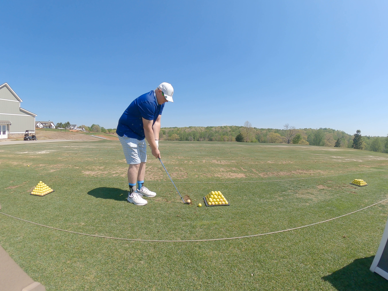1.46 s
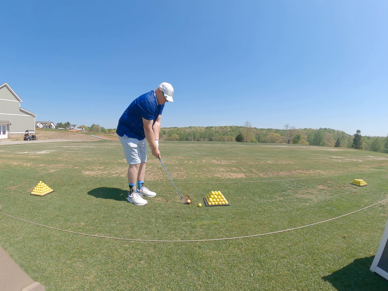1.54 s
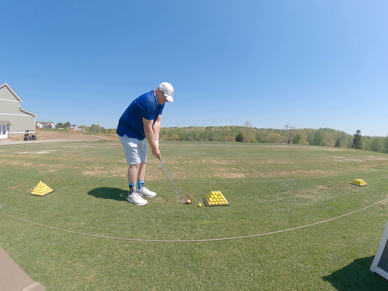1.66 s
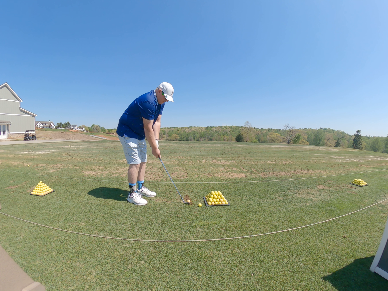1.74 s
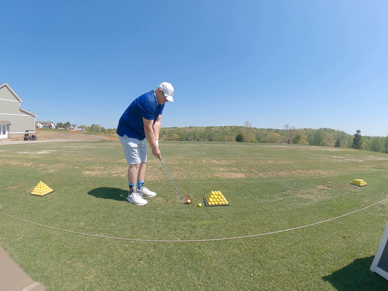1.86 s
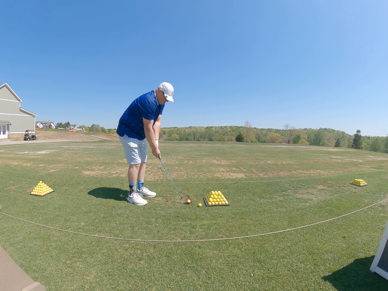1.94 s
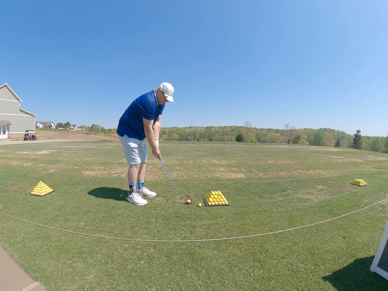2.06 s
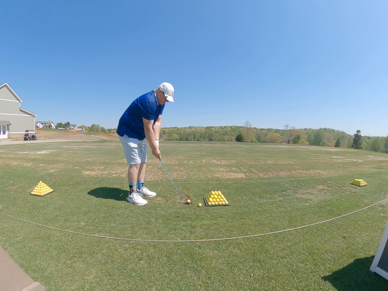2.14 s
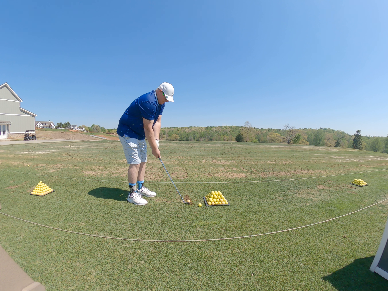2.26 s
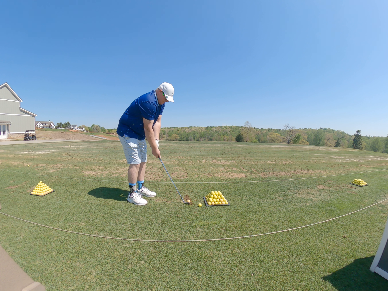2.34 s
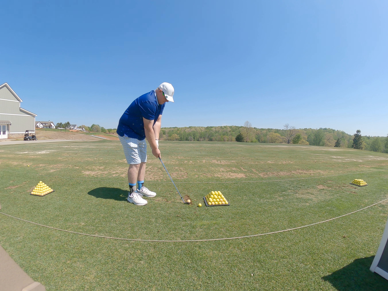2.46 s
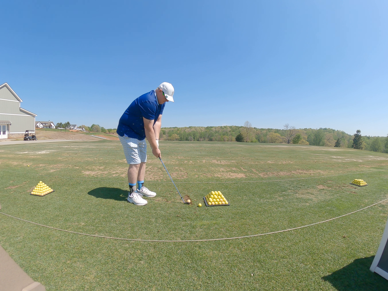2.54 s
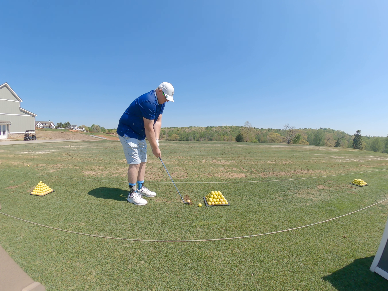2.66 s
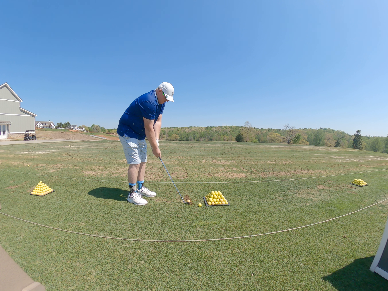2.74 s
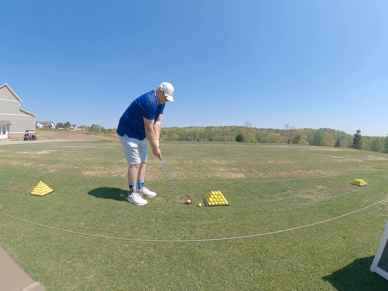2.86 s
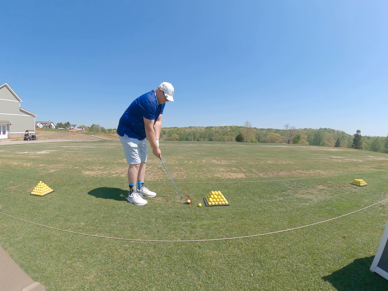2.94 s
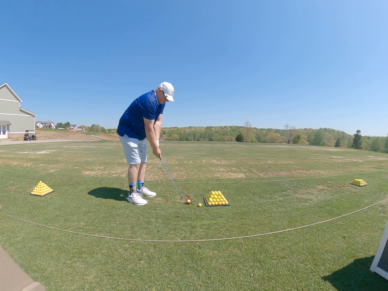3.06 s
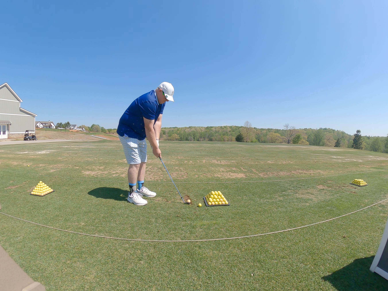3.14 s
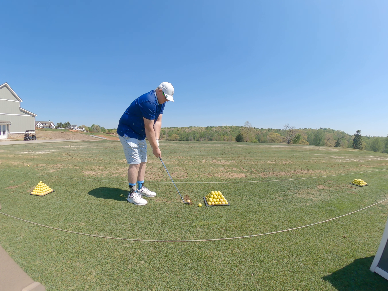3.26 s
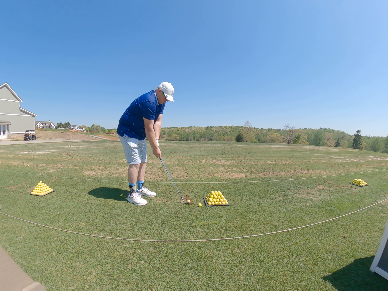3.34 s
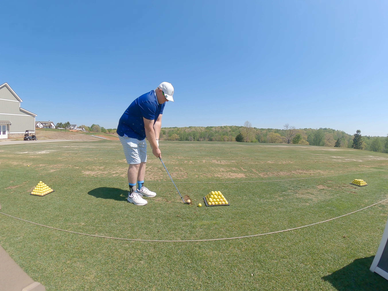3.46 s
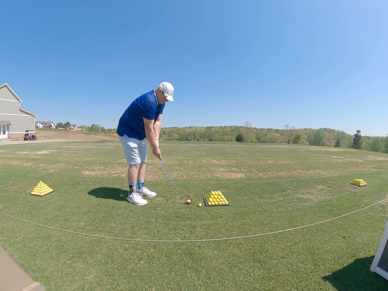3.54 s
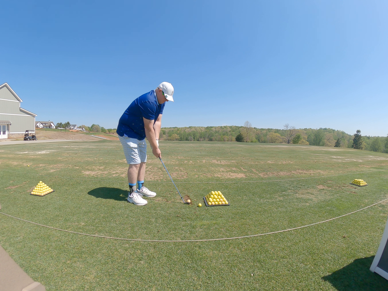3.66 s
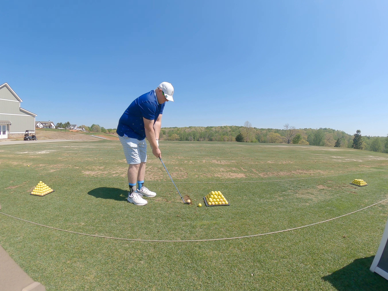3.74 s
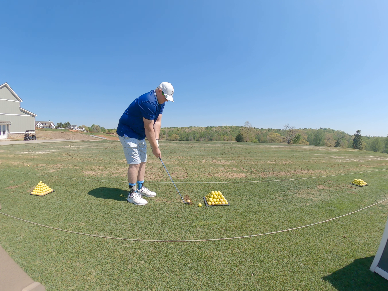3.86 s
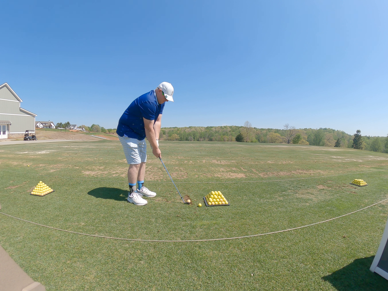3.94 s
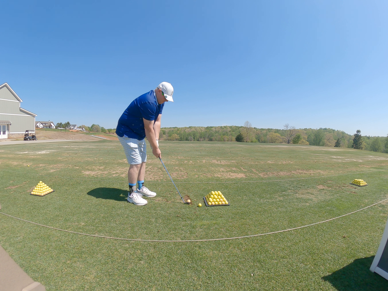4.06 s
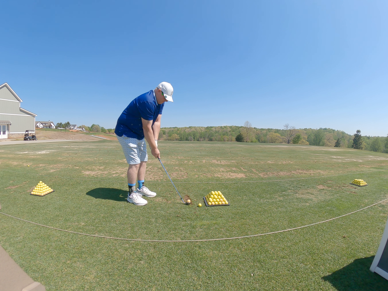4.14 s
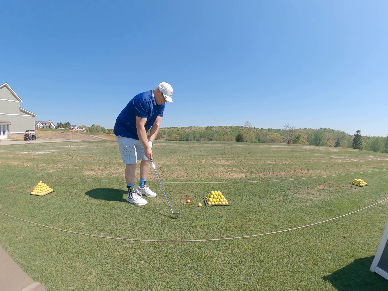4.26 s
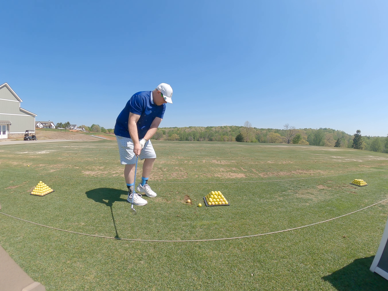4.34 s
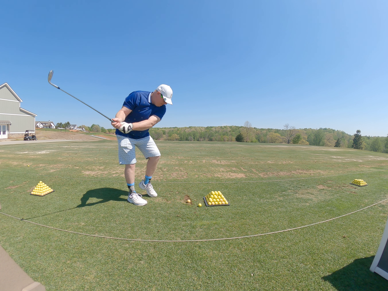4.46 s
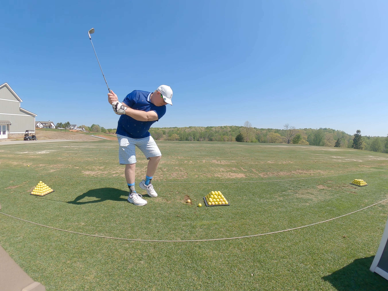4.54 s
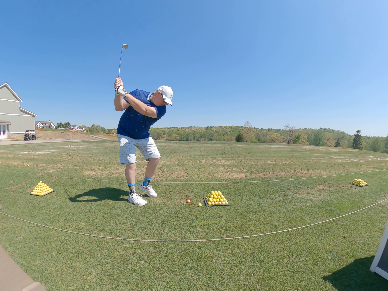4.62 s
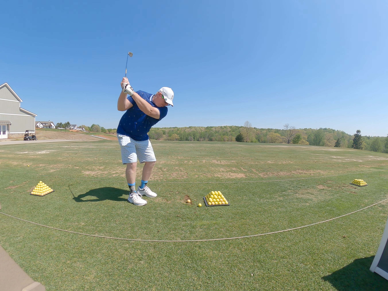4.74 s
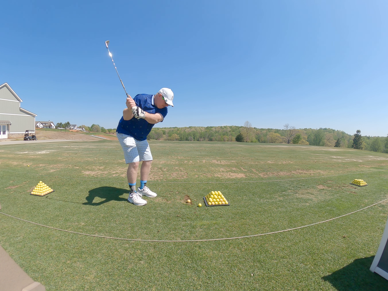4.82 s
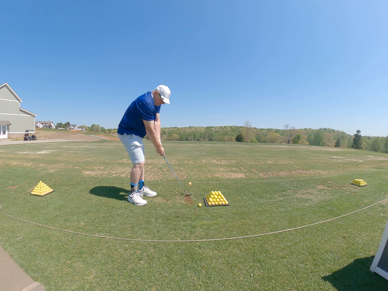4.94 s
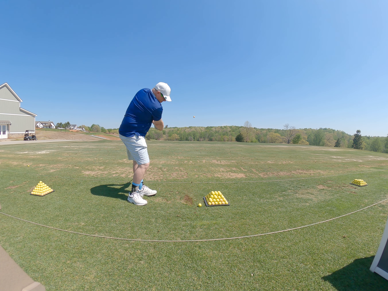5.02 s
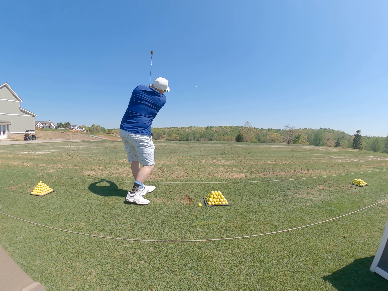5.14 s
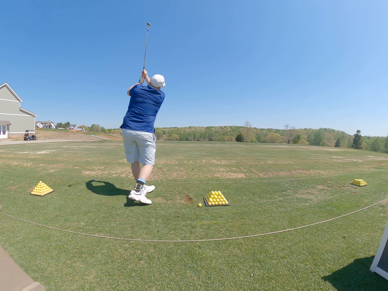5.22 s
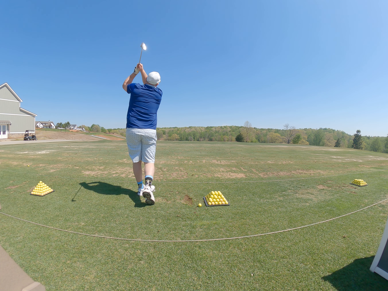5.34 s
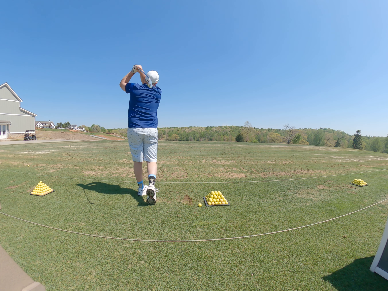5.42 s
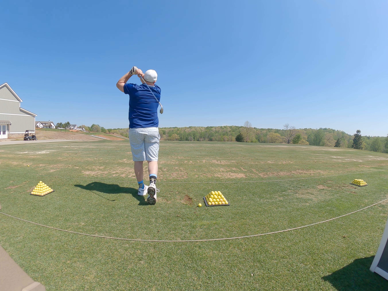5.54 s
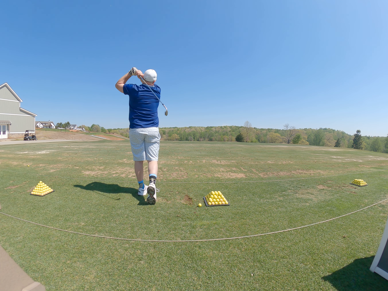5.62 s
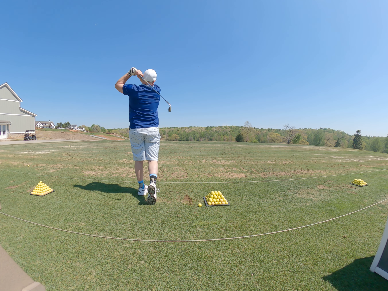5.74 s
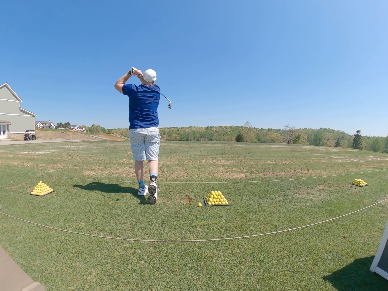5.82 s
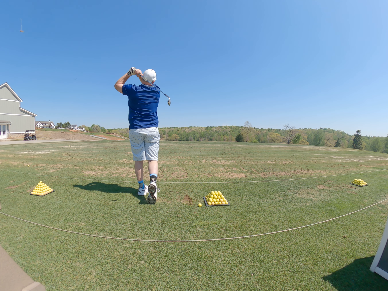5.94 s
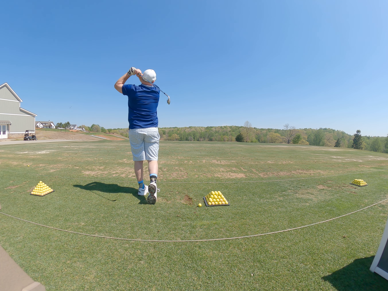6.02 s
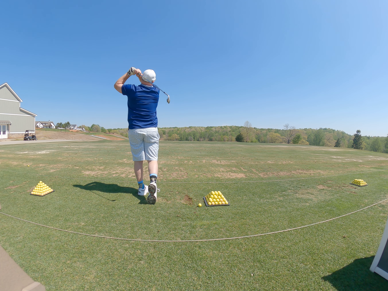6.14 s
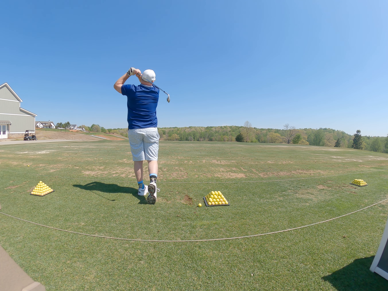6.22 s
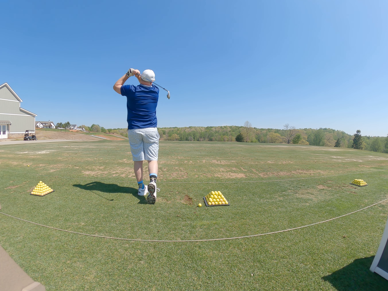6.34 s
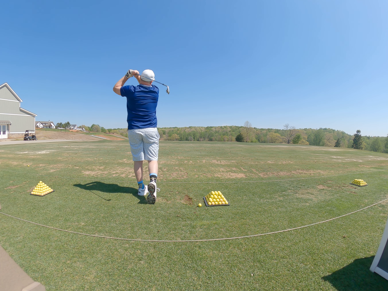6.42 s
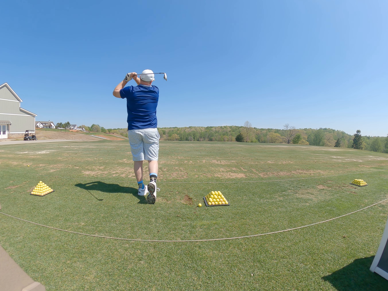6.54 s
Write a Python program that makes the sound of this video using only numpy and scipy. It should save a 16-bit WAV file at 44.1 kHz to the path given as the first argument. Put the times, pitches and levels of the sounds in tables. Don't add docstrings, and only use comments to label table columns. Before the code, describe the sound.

Steady low engine drone and soft outdoor hush with faint bird whistles, then one very loud, dry golf-club crack and a brief patter of soil.

```python
import sys
import numpy as np
from scipy import signal
from scipy.fft import rfft, irfft, next_fast_len
from scipy.io import wavfile
from scipy.ndimage import uniform_filter1d

SR = 44100
rng = np.random.default_rng(int(sys.argv[2]) if len(sys.argv) > 2 else 0)


def unload_audio(sound):
    columns = np.transpose(np.atleast_2d(sound))
    steps = np.round(np.clip(columns, -1, 1) * 32767)
    wavfile.write(sys.argv[1], SR, steps.astype(np.int16))


def invert_db(x):
    u = np.asarray(x, float) / 20
    return 10 ** u


N = 290178
TIME = np.arange(N) / SR
STRIKE_S = 5.06769

# [time_s, strength_db]
WIND = [(0.0, 10.5), (0.2, 0.5), (0.62, 4), (1.0, -3), (1.3, 0.2), (1.56, 2), (1.8, 1.5), (2.05, 3),
        (2.45, -3.5), (2.95, 2.5), (3.25, -0.2), (4.05, 1.5), (4.4, 6.5), (5.8, 4), (5.95, 1), (6.25, -1.5),
        (6.45, 2), (6.58, -0.5)]


def band(x, hz, octaves):
    size = next_fast_len(len(x))
    f = np.fft.rfftfreq(size, 1 / SR) + 1
    bell = np.exp(-.5 * (np.log2(f / hz) / octaves) ** 2)
    y = irfft(rfft(x, size) * bell, size)[:len(x)]
    return y / np.sqrt(np.mean(y ** 2))


def walk(rate):
    k = int(SR / rate)
    held = np.repeat(rng.standard_normal(N // k + 1), k)
    return 1.301 * uniform_filter1d(uniform_filter1d(held, k), k)[:N]


def curves(table, t=TIME):
    s, *columns = np.transpose(table)
    return [np.interp(t, s, c) for c in columns]


def add(out, s, x, pan_db=0., lag=0):
    i, size = int(s * SR), next_fast_len(len(x) + 32)
    f = np.fft.rfftfreq(size, 1 / SR)
    delay_s = lag / SR / (1 + (f / 5000) ** 4)
    late = irfft(rfft(x, size) * np.exp(-2j * np.pi * f * delay_s), size)
    out[0, i:i + len(x)] += late[:len(x)] * invert_db(pan_db / 2)
    out[1, i:i + len(x)] += x * invert_db(-pan_db / 2)


def ring(t, hz, db, t60, rise_ms, sign):
    build = 1 - np.exp(-1000 * t / rise_ms)
    return np.sign(sign) * np.sin(2 * np.pi * hz * t) * invert_db(db - 60 * t / t60) * build


def whistle(hz, db, rough=.01, taper=0.23):
    shiver = band(rng.standard_normal(len(hz) + 2000), 140, 0.98)[:len(hz)]
    tone = np.sin(2 * np.pi * np.cumsum(hz * (1 + rough * shiver)) / SR)
    level = np.sqrt(2) * invert_db(db + 2.5 * shiver[::-1])
    return level * tone * signal.windows.tukey(len(hz), taper)


def glides(out, table, pan_db, lag, rough):
    for s, length, from_hz, to_hz, db in table:
        hz = np.linspace(from_hz, to_hz, int(length * SR))
        add(out, s, whistle(hz, db, rough), pan_db, lag)


def strike(out):
    # [pitch_hz, level_db, t60_s, rise_ms, first_swing_sign]
    face_modes = [(1300, -13.5, 0.0074, .8, -1), (2330, -11, 0.012, 1.6, -1), (950, -18, 0.011, 1.08, -1),
                  (1990, -17.5, 0.022, 0.96, -1), (4240, -24, 0.015, 0.22, 1),
                  (4730, -21.5, 0.011, 0.18, 1), (5600, -22.5, 0.013, 0.25, -1),
                  (6500, -23.5, 0.013, .2, 1), (7600, -23.5, 0.019, .2, -1), (9440, -8, 0.0038, 0.24, 1),
                  (10540, -19, 0.0033, .1, 1), (14000, -17.5, .006, .2, 1)]
    # [pitch_hz, level_db, t60_s, rise_ms, first_swing_sign]
    beating_modes = [(3070, 5.7, .0064, 2.1, 1), (3350, -7.3, .016, 3., -1)]
    # [delay_ms, pitch_hz, level_db, t60_s, first_swing_sign]
    turf_modes = [
        (.4, 190, -17, 0.083, -1),
        (1.9, 95, -12.5, 0.065, 1),
        (0.71, 400, -21.5, 0.028, -1),
    ]

    t = np.arange(5000) / SR
    squash_hz, squash_ms, squash_db = 1230, .315, -2.6
    centred = t[:100] - 50 / SR
    pulse = np.exp(-.5 * (1000 * centred / squash_ms) ** 2)
    squash = invert_db(squash_db) * np.cos(2 * np.pi * squash_hz * centred) * pulse
    add(out, STRIKE_S + .00051 - 50 / SR, squash, pan_db=-2.8, lag=1.3)

    for mode in [*beating_modes, *face_modes]:
        pan_db = -1.5 if mode[0] < 6000 else 1.
        add(out, STRIKE_S, ring(t, *mode), pan_db=pan_db, lag=1.3)

    tear = invert_db(-21.5) * band(rng.standard_normal(len(t)), 2700, 1.0) * np.exp(-(t / 0.0047) ** 2)
    add(out, STRIKE_S, tear, pan_db=-1.0, lag=1.2)

    for delay_ms, hz, db, t60, sign in turf_modes:
        add(out, STRIKE_S + delay_ms / 1000, ring(t, hz, db, t60, 0.22, sign))


def swish(out):
    # [time_s, level_db]
    head_track = [(4.93, -63), (4.991, -52.5), (5.01, -44), (5.04, -37.5), (5.055, -42), (5.0642, -31.5),
                  (5.076, -35), (5.08, -61), (5.092, -50), (5.115, -62.5)]
    impact_hz, lowest_hz, climb_octaves_per_s = 1370, 240, 38
    hiss_db, hiss_grow_db_s, hiss_past_db = -3, 59.5, -22

    t = np.arange(head_track[0][0], head_track[-1][0], 1 / SR)
    db, = curves(head_track, t)
    before = (t - STRIKE_S).clip(max=0)
    past = ((t - STRIKE_S) / .015).clip(0, 1)
    hz = np.maximum(impact_hz * 2 ** (climb_octaves_per_s * before), lowest_hz)
    noise = rng.standard_normal((3, len(t)))
    howl = 0
    for f in 300 * 2 ** np.arange(0, 3, .25):
        weight = np.exp(-.5 * (np.log2(f / hz) / .95) ** 2)
        howl = howl + weight * band(noise[0], f, .2) / 3.4
    hiss = band(noise[1], 2500, 1.1) * invert_db(1.6 * band(noise[2], 200, 1.0))
    hiss_level = invert_db(hiss_db + hiss_grow_db_s * before + hiss_past_db * past)
    add(out, t[0], invert_db(db) * (howl + hiss_level * hiss), pan_db=0.5, lag=1.8)


def spray(out):
    first_s, peak_s, last_s = 5.181, 5.212, 5.55
    shower_db, rise_db_s, fall_db_s = -38, 328, 246
    straggle_db, straggle_fall_db_s = -46.5, 69

    heard = slice(int(first_s * SR), int(last_s * SR))
    since = TIME[heard] - peak_s
    after = since.clip(0)
    rise = invert_db(rise_db_s * since.clip(max=0)) * ((TIME[heard] - first_s) / 0.0039).clip(0, 1)
    fall = invert_db(shower_db - fall_db_s * after) + invert_db(straggle_db - straggle_fall_db_s * after)
    landings = rng.random(N) < 4000 / SR
    grains = landings * rng.standard_normal(N) * invert_db(3.2 * rng.exponential(size=N).clip(0, 3))
    noise = rng.standard_normal((2, len(since)))
    soil = band(grains[heard], 2240, 1.0) + 0.31 * band(noise[0], 2640, 1.0)
    soil = soil + 0.75 * band(noise[1], 750, 1.0)
    x = np.zeros(N)
    x[heard] = rise * fall * soil
    add(out, 0, x * invert_db(-5.5), pan_db=0.0, lag=1.6)


def clods(out):
    # [start_s, length_s, from_hz, to_hz, level_db]
    splits = [(5.178, 0.009, 2020, 3300, -51), (5.186, 0.0089, 1780, 2070, -43),
              (5.22, 0.007, 2640, 1720, -45), (5.211, 0.0066, 2260, 1950, -34.5),
              (5.212, 0.008, 4200, 5320, -40.5), (5.22, 0.0054, 5010, 5700, -41),
              (5.224, 0.0091, 4230, 5600, -47), (5.244, 0.013, 1220, 1520, -40),
              (5.249, 0.0083, 4000, 4360, -48)]
    glides(out, splits, -0.99, lag=0.68, rough=0.09)


def ticks(out):
    # [start_s, peak_db, centre_hz, left_minus_right_db]
    cleat_ticks = [(.03, -62, 6000, 3), (0.0026, -54, 7000, 3), (0.14, -55, 8000, 2), (.1155, -60, 5000, 2),
                   (.1325, -59, 4000, 2), (4.758, -51, 910, 11), (.575, -67, 4000, 2),
                   (0.1306, -54, 6200, 2), (0.8929, -55.5, 5400, 3), (3.697, -58, 13000, 8),
                   (3.7, -55.5, 4300, -6), (.894, -63, 1700, 4), (5.742, -64, 9460, 3.5),
                   (5.5917, -56, 6200, 5), (5.626, -49, 950, 13), (5.664, -52.5, 4600, 9),
                   (4.3, -50, 860, 4.5), (5.8057, -46.5, 4600, 10)]
    # [start_s, peak_db, centre_hz,
    # left_minus_right_db]
    grit_ticks = [(4.591, -41.5, 2780, 2), (5.198, -48, 5500, 1), (5.2895, -45, 7500, 1),
                  (5.3075, -42, 5500, 0), (5.32, -44, 1300, 0), (5.328, -46, 3000, 2),
                  (5.3515, -45, 1900, 3), (5.362, -51, 4000, 1), (5.367, -50, 7500, 1),
                  (5.383, -47, 5500, 1), (5.4175, -51, 2500, 1), (5.431, -50, 4000, 1),
                  (5.4465, -53, 3200, 1), (5.459, -53, 8000, 1), (5.599, -56, 8500, 7), (5.6, -50, 2490, 7),
                  (5.754, -63, 5500, 5), (5.7575, -54, 3500, 8), (5.774, -57, 1500, 6),
                  (5.787, -52, 1800, 6), (5.813, -48, 1500, 8), (5.839, -57, 2000, 8),
                  (5.0086, -37.5, 3800, 4), (5.0642, -24, 1110, -14), (5.066, -34, 1400, -2),
                  (5.193, -45, 5000, 1), (5.2012, -48, 6500, 4), (5.2255, -42, 8000, 1),
                  (5.242, -43, 6000, 1), (5.2465, -38, 7000, -1), (5.272, -50, 4500, 1),
                  (5.2775, -39, 3500, 1), (5.304, -44, 4000, 1), (5.3115, -48, 2500, 1),
                  (5.142, -41.5, 1077, 1), (5.2374, -36, 5500, 8), (5.2564, -40, 4330, 8),
                  (5.2634, -46, 8500, 1.2), (5.2889, -51, 2910, 6), (5.307, -31, 960, -1.5),
                  (5.3243, -35, 3580, 4), (5.3424, -54, 7000, 1.2), (5.3534, -44, 4630, -3),
                  (5.366, -37.5, 1430, -0.5), (5.378, -41.5, 2600, 5), (5.4245, -47, 3500, 9),
                  (5.465, -44, 1090, 0.6)]

    t = np.arange(2048) / SR
    # octaves, decay in ms at 1 kHz, strength of first contact
    kinds = ((cleat_ticks, .5, 4, 2.5), (grit_ticks, .85, 2.6, 4.5))
    for table, octaves, longest_ms, contact in kinds:
        for s, db, hz, pan_db in table:
            decay_ms = longest_ms * (1000 / hz) ** .4
            push = rng.standard_normal(len(t)) * np.exp(-t * 1000 / decay_ms)
            push[0] = contact * np.sqrt(5000 / hz)
            click = band(np.roll(push, 128), hz, octaves)
            add(out, s + .0005 - 128 / SR, invert_db(db + 3) * click / np.abs(click).max(), pan_db)


def scuffs(out):
    # [start_s, length_s, rasp_db, hiss_db, left_minus_right_db]
    drags = [(0.0, .09, -70, -85, 1.5), (0.093, .06, -82, -72.5, 5), (0.271, .07, -67.5, -91, 1),
             (0.37, 0.1, -64.5, -92, 1), (0.889, 0.028, -70, -63, 4), (3.969, 0.024, -65, -61.5, 6),
             (4.286, .05, -66, -73, 1.2), (4.311, 0.032, -61.5, -72, 0), (4.763, 0.032, -58.5, -68, 12),
             (5.504, 0.049, -58, -73, 8), (5.585, 0.034, -54.5, -61.5, 9), (5.616, 0.075, -53, -61, 8.5),
             (5.654, 0.044, -54.5, -65.5, 8), (5.754, 0.042, -53.5, -69, 9),
             (5.803, 0.039, -52.5, -66.5, 10.5)]
    for s, length, low_db, hiss_db, pan_db in drags:
        hz = 980 * 2 ** (.035 * max(-57.5 - low_db, 0))
        noise = rng.standard_normal((5, 4096))
        n = min(int(1.44 * length * SR), 4096)
        share = np.linspace(0, 1, n)
        drag = 3 * np.sqrt(share) * (1 - share) ** 1.8
        patchy = invert_db(3 * band(noise[4], 300, 1.2))
        i = int(s * SR)
        for port in range(2):
            rasp = invert_db(low_db) * band(noise[port], hz, 0.6) * patchy
            hiss = invert_db(hiss_db) * band(noise[2 + port], 2830, 1.0)
            out[port, i:i + n] += (rasp + hiss)[:n] * drag * invert_db(pan_db * (.5 - port))


def heels(out):
    # [start_s, pitch_hz, length_s, level_db]
    thuds = [
        (3.695, 144, 0.011, -20.5),
        (4.761, 204, 0.0208, -24.5),
    ]
    for (s, hz, length, db), sign in zip(thuds, (1, -1)):
        t = np.arange(-length / 2, length / 2, 1 / SR)
        push = invert_db(db) * np.exp(-.5 * (6 * t / length) ** 2)
        add(out, s, sign * push * np.cos(2 * np.pi * hz * t), lag=4.6)


def squeaks(out):
    # [start_s, length_s, from_hz, to_hz, level_db]
    sole_chirps = [(.129, .008, 6500, 6800, -64), (.115, .005, 7000, 6900, -66),
                   (5.592, .02, 5450, 5250, -69), (5.663, .022, 5450, 5100, -65),
                   (5.668, 0.011, 7600, 7400, -72), (5.733, .016, 4950, 5150, -77),
                   (5.431, .007, 8500, 8600, -69), (5.4, 0.01, 6600, 6900, -70)]
    glides(out, sole_chirps, 6., lag=0, rough=.02)


def cloth(out):
    # [time_s, share_of_full_rustle]
    rustle = [(4.101, 0), (4.6, 0.96), (4.98, 0.88), (5.11, 0.9), (5.16, 1.6), (5.45, 0.5), (5.6, 0.031),
              (5.9, 0.21)]
    t = np.arange(rustle[0][0], rustle[-1][0], 1 / SR)
    noise = rng.standard_normal((4, len(t)))
    patches_db = 1.2 * band(noise[3], 18, 1.2)
    swell = curves(rustle, t)[0].clip(0) * invert_db(-67.5 + patches_db)
    both, left, right = (band(v, 3700, 1) for v in noise[:3])
    i = int(t[0] * SR)
    out[:, i:i + len(t)] += swell * (both + 0.95 * np.array([left, right]))


def sleeve(out):
    start_s, length_s, hz, db = 4.2, .145, 9000, -71
    n = int(length_s * SR)
    share = np.linspace(0, 1, n)
    swell = share * (12 * (1 - share)).clip(0, 1)
    add(out, start_s, invert_db(db) * band(rng.standard_normal(n), hz, 0.36) * swell, pan_db=2.)


def birds(out):
    # [start_s, length_s, level_db, opening_slide_hz, second_note_minus_first_db]
    calls = [
        (1.347, 0.105, -65.5, 1.2, -9),
        (2.381, .1, -64, 53, -4),
        (2.884, .1, -64.5, 37, 1),
        (3.532, 0.14, -70.5, 66, -3),
    ]
    # [start_s, length_s, from_hz, to_hz, level_db]
    stray_notes = [(0.023, 0.13, 3750, 3610, -78), (0.7, 0.065, 3680, 3660, -88),
                   (1.2, 0.06, 3080, 3090, -88), (1.225, .022, 3700, 3200, -86),
                   (.515, .025, 3150, 2950, -85), (.527, .012, 2500, 2250, -82),
                   (.9, 0.033, 3080, 3080, -83), (1.455, .03, 3000, 3500, -86), (3.0, .02, 2350, 2250, -80),
                   (3.28, .025, 2250, 2200, -82), (1.94, 0.077, 2900, 2880, -86),
                   (2.65, .015, 4080, 4000, -84), (0.533, 0.028, 2240, 2140, -78),
                   (1.13, .025, 3000, 2520, -81), (1.15, 0.025, 2170, 2080, -81),
                   (2.913, 0.029, 2270, 2230, -77), (1.601, 0.018, 3210, 3200, -78),
                   (1.612, 0.012, 2900, 2400, -78), (1.622, .03, 2330, 2280, -81),
                   (2.02, .018, 2900, 2250, -81), (2.535, .014, 3000, 2350, -82),
                   (5.97, 0.047, 2045, 2150, -78), (2.032, 0.032, 2180, 2110, -80),
                   (2.85, .025, 3880, 3860, -83), (2.818, .05, 3400, 3500, -87),
                   (1.464, .02, 2350, 2200, -79), (2.5, 0.064, 3150, 3000, -80),
                   (2.542, 0.042, 2320, 2250, -78), (3.03, 0.026, 3810, 3830, -80),
                   (3.245, 0.045, 3480, 3400, -85), (4.824, 0.017, 2900, 3390, -75),
                   (5.432, 0.012, 3640, 2760, -67), (5.484, 0.031, 1960, 2330, -72),
                   (5.517, 0.029, 2670, 3270, -69.5), (6.439, 0.037, 2650, 2390, -77),
                   (6.49, .05, 2200, 2050, -78)]
    high_hz, low_hz, sag_hz = 3165, 2220, 330
    step_at, step_width, full_at = .69, .034, .6
    trees_db, trees_decay_s = -11, .045

    for s, length, db, slide, low_db in calls:
        share = np.linspace(0, 1, int(length * SR))
        drawl = length > .103
        step = (share - step_at) / step_width / (1.5 if drawl else 1)
        hz = low_hz + (high_hz - sag_hz * share ** 3 - low_hz) / (1 + np.exp(step))
        hz = hz + slide * (1 - 2.5 * share).clip(-.3, 1)
        opening_db = -11 * (1 - share / full_at).clip(0) ** 2
        step_db = (-3 if drawl else -8) * np.exp(-(step / 3) ** 2)
        second_db = low_db / (1 + np.exp(5 - 2 * step))
        call = whistle(hz, db + (opening_db + step_db + second_db), rough=.012, taper=.2)
        add(out, s, call, 0., lag=5.0)
        trees = rng.standard_normal(8000) * np.exp(-TIME[:8000] / trees_decay_s)
        echo = signal.fftconvolve(call, trees / np.sqrt(np.sum(trees ** 2)))
        add(out, s + 0.0068, invert_db(trees_db) * echo, 0., lag=-2.2)
    glides(out, stray_notes, 0.93, lag=1, rough=0.01)


def engine(hz, track, orders, waver_db, drift):
    db, load_db = curves(track)
    phase = 2 * np.pi * np.cumsum(hz * (1 + drift * walk(3))) / SR
    drone = 0
    for k, order_db in orders:
        level_db = db + order_db + (k > 1) * load_db + waver_db * np.sqrt(k) * walk(4)
        drone = drone + np.sqrt(2) * invert_db(level_db) * np.sin(k * phase + k)
    return drone


def mower(out):
    # [time_s, level_db, overtone_load_db]
    effort = [(0, -42, -2.5), (.7, -35.5, -1.5), (1.5, -35, -6.5), (2.201, -37.5, -1), (2.9, -37.5, 3.5),
              (3.6, -36, -5), (4.3, -34.5, -5.5), (5.0, -35, 3), (5.701, -35.5, 3), (6.58, -37.5, -6.5)]
    # [multiple, level_db]
    orders = [(1, 0), (2, -14.5), (3, -30.5), (4, -23.5), (5, -32.5), (6, -37.5)]
    out += engine(84.85 - .048 * TIME ** 2, effort, orders, waver_db=0.92, drift=.003)


def truck(out):
    # [time_s, level_db, overtone_load_db]
    effort = [(0, -63.5, -12), (1.0, -47.5, 1), (2.5, -51.5, -15.5), (3.1, -49, -2), (3.6, -35, -13),
              (4.001, -50, -0.5), (4.4, -35.5, -2), (5.2, -48.5, 0), (6.0, -44, 4.5), (6.58, -41.5, -10)]
    # [multiple, level_db]
    orders = [(1, -7), (2, -8)]
    firing_hz, shift_s, shift_length_s, drop_hz, regain_s = 68.2, 3.1, 0.19, 12, 2.6
    since = TIME - shift_s
    regain = np.exp(-(since.clip(0) / regain_s) ** 2)
    revs_hz = firing_hz - drop_hz * regain / (1 + np.exp(-since / shift_length_s))
    out += engine(revs_hz, effort, orders, waver_db=2.0, drift=.01)


def tractor(out):
    # [time_s, level_db, overtone_load_db]
    effort = [(0, -54, 16), (.5, -48, 3), (1.2, -48.5, 1), (2.0, -50, -6.5), (2.8, -45, 0),
              (3.4, -42, -10.5), (4.3, -43, 0), (5.0, -41, -6), (5.8, -41.5, -10), (6.58, -41.5, -5.5)]
    # [multiple, level_db]
    orders = [(1, -2), (2, -7.5), (3, -18), (4, -29.5)]
    drone = engine(104.5 - .075 * TIME ** 2, effort, orders, waver_db=1.3, drift=.003)
    add(out, 0, drone, lag=4)


def road(out):
    start_s, length_s, hz, db = 0, .3, 1290, -63.5
    n = int(length_s * SR)
    fade = np.linspace(1, 0, n) ** .5
    add(out, start_s, invert_db(db) * band(rng.standard_normal(n), hz, 0.08) * fade, lag=2.3)


def insects(out):
    breeze, = curves(WIND)
    for port in range(2):
        level = invert_db(-93 + .6 * breeze + 3.5 * walk(5.8))
        out[port] += level * band(rng.standard_normal(N), 11800, .07)


def air():
    # [pitch_hz, level_db_per_hz]
    spectrum = [(20, -18), (60, 4), (130, -2), (260, -11.5), (450, -22.5), (750, -38.5), (1030, -29.5),
                (1400, -29.5), (1800, -39.5), (2700, -41.5), (3700, -50), (6000, -43.5), (8000, -54),
                (9900, -61), (15500, -72)]
    # [pitch_hz, side_minus_mid_db]
    spread = [(60, -21.5), (110, -23), (200, -14.5), (380, -8.5), (700, -4), (1290, -11), (2380, -9),
              (4400, -2.5), (8120, -5), (15000, -5)]

    def at(table, hz):
        table_hz, table_db = np.transpose(table)
        return np.interp(np.log(hz), np.log(table_hz), table_db)

    breeze, = curves(WIND)
    rumble_db = 0.2 + 0.29 * breeze
    traffic_db = -0.7 + .2 * breeze
    leaves_db = -3.5 + breeze
    out, gust = 0, walk(7.2)
    for hz in 25 * 2 ** np.arange(0, 9.1, 1 / 3):
        leafy = np.clip(np.log2(hz / 1500), 0, 1)
        swell = rumble_db
        if hz >= 500:
            swell = traffic_db + leafy * (leaves_db - traffic_db + 1.5 * gust)
        octaves = .2 if hz < 7000 else .125
        both = band(rng.standard_normal(N), hz, octaves)
        apart = band(rng.standard_normal(N), hz, octaves)
        top_swing_db = (hz > 8500) * 1.3 * breeze
        db = at(spectrum, hz) + 10 * np.log10(hz) + swell + top_swing_db + 0.94 * walk(7.3) - 73
        lag = 5 if 500 < hz < 2600 else 0
        mid = np.array([np.roll(both, lag), both])
        side = invert_db(at(spread, hz)) * apart * np.array([[1], [-1]])
        out = out + invert_db(db) * (mid + side)
    return out


def scene():
    out = air()
    sources = (strike, swish, spray, clods, ticks, scuffs, heels, squeaks, cloth, sleeve,
               birds, mower, truck, tractor, road, insects)
    for source in sources:
        source(out)
    return out


def roll_off(x):
    return signal.sosfilt(signal.butter(12, 15980, fs=SR, output="sos"), x)


def record(dry):
    mic_top_hz, cut_hz, edge_s = 10900, 15000, .006
    knee, ceiling = .8, .98
    gain = signal.windows.tukey(N, 2 * edge_s * SR / N)
    mic = signal.sosfilt(signal.butter(4, mic_top_hz, fs=SR, output="sos"), dry * gain)
    over = (np.abs(mic) - knee).clip(0)
    room = ceiling - knee
    mic = mic - np.sign(mic) * (over - room * np.tanh(over / room))
    mic = signal.sosfilt(signal.ellip(6, .3, 50, cut_hz, fs=SR, output="sos"), mic)
    return roll_off(mic)


dry = scene()
out = record(dry)
unload_audio(out)
```